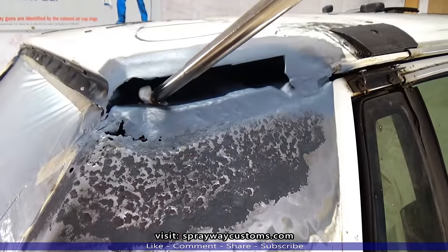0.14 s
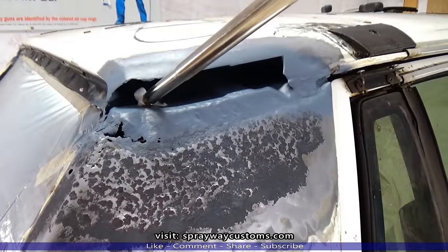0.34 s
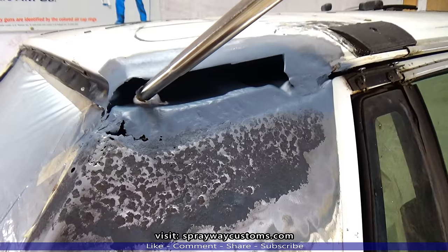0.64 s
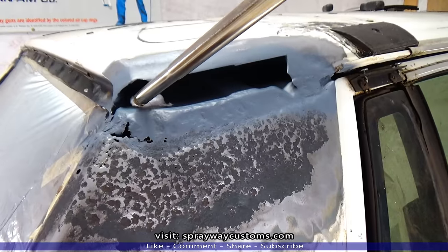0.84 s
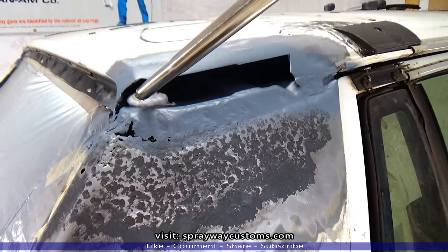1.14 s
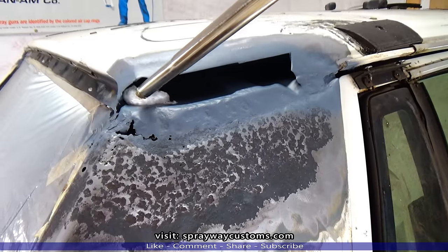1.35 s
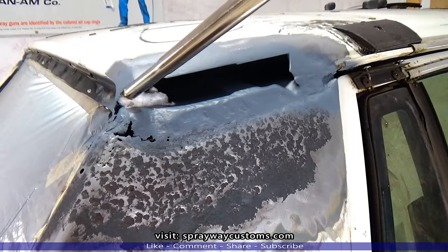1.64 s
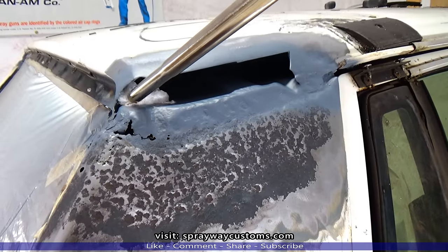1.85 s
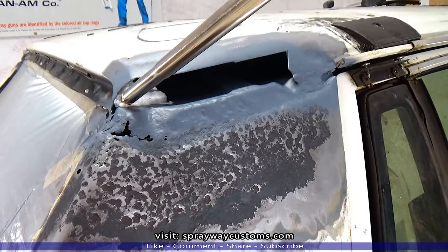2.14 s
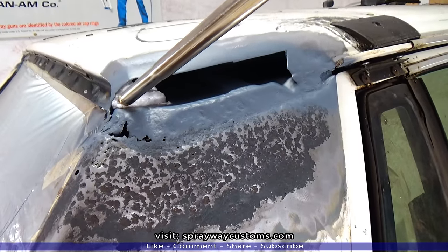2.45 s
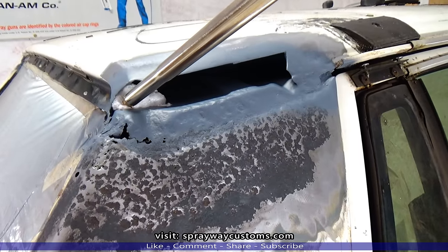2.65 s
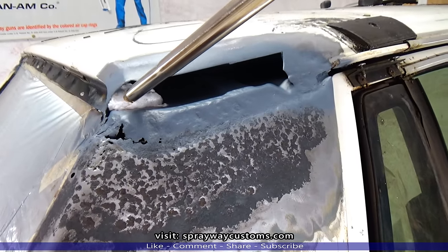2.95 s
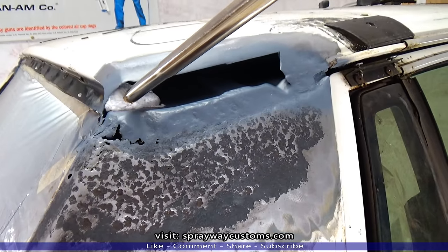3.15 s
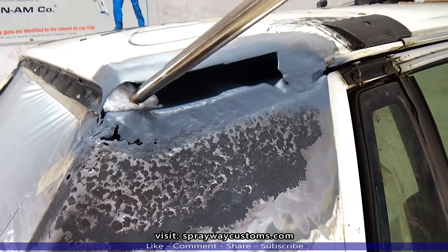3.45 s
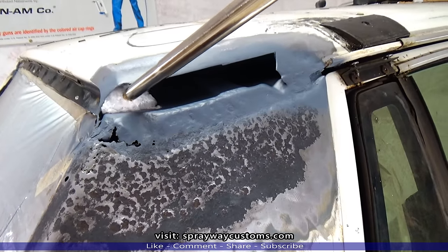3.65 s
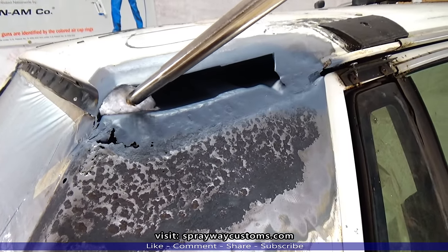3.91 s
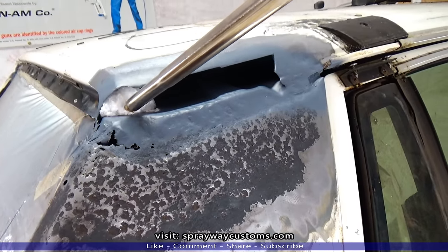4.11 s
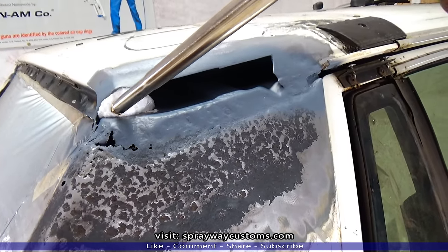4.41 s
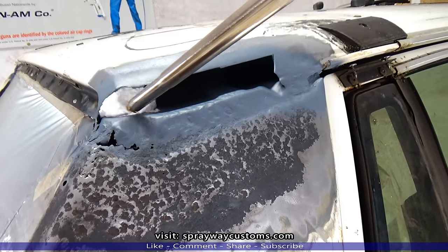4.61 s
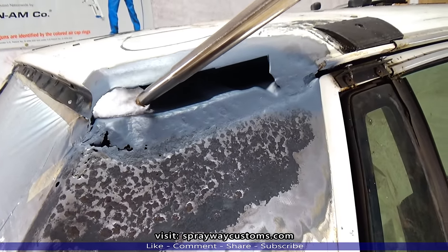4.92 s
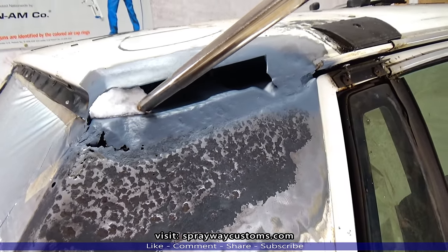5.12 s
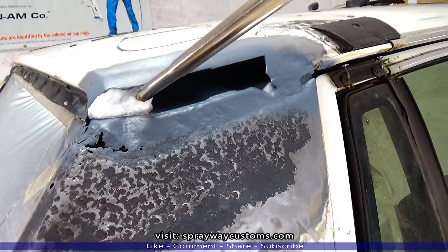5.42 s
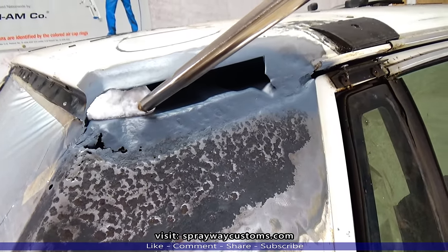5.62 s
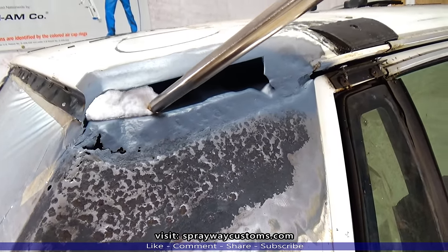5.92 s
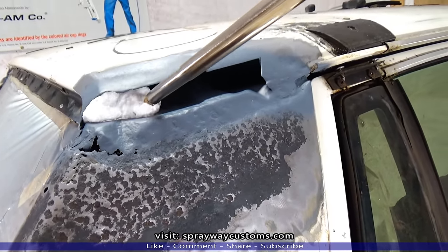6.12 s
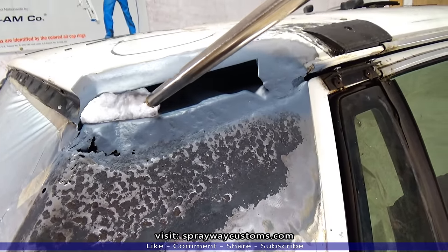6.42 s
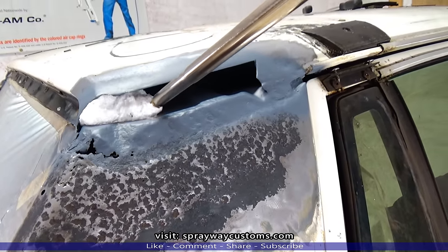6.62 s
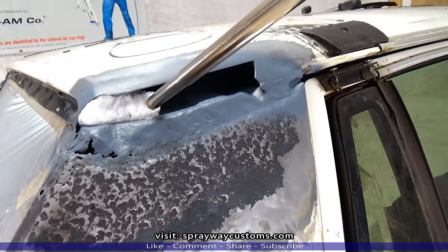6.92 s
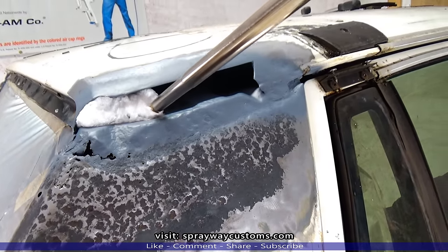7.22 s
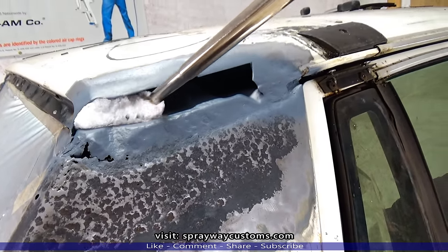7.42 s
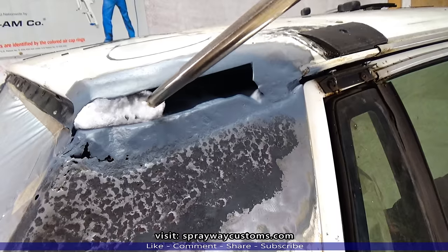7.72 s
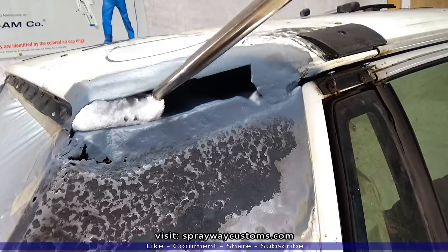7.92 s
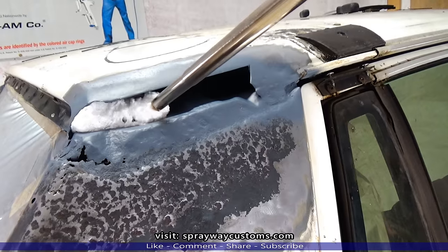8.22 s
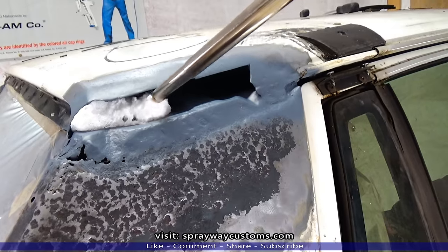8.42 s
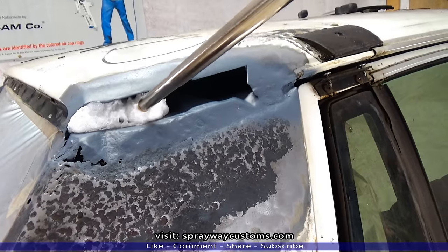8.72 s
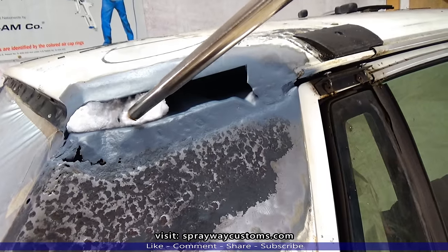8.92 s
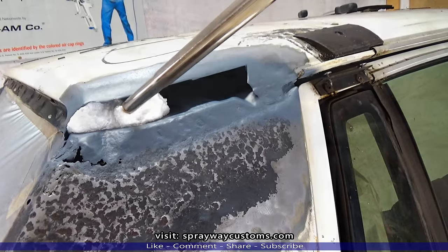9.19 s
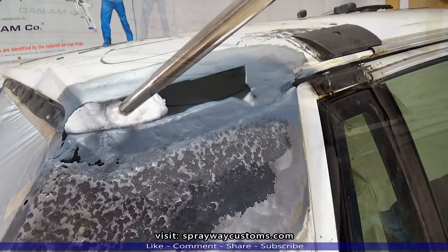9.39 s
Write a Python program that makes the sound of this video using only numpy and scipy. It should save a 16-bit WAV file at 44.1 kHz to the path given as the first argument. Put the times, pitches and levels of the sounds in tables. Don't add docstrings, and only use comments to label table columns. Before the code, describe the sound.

Very close, dry gas pops snap unevenly from a foam nozzle inside a hollow metal car body, with tiny ticks between them. A sharp metallic knock comes early. The pops thin out, grow busy again, then turn into hissing spurts and wet sputtering around six seconds, continuing to the end. A small microphone with little bass hears a faint garage hum behind.

```python
import sys
import numpy as np
from scipy import signal
from scipy.fft import rfft, irfft
from scipy.io import wavfile
from scipy.ndimage import uniform_filter1d

SR = 44100
rng = np.random.default_rng(int(sys.argv[2]) if len(sys.argv) > 2 else 0)


def transcribe(signal):
    frames = np.atleast_2d(signal).T
    limited = np.clip(frames, -1, 1)
    pcm = np.round(limited * 32767).astype(np.int16)
    wavfile.write(sys.argv[1], SR, pcm)


def linear_from_db(decibels):
    return 10 ** (np.asarray(decibels, float) / 20)


N = 421155
LEFT_RIGHT = np.array([[1], [-1]])

# pitch_hz, level_db (per Hz)
AIR_SPECTRUM = [(20, -28), (40, -0.5), (70, 1.5), (130, 6), (280, 6), (600, 1.5), (2000, -13.5),
                (16000, -12.5)]
# pitch_hz, level_db
FAN_TONES = [(263.8, -68), (312.2, -68)]
# time_s, left_minus_right_db
LEAN = [(0, .7), (2.3, .8), (3.2, 2), (3.7, -.2), (4.3, 0), (5.5, 1), (7, .3), (8.7, .2), (9.55, .9)]
# start_s, peak_db, contact_hardness_hz, on_rim (0 = open panel, 1 = folded rim)
KNOCKS = [(0.276, -36.5, 1300, 0), (0.303, -33, 1530, 0), (0.404, -27, 1300, 0), (0.947, -31, 1920, 0),
          (1.2742, -11.5, 2300, 0), (1.719, -20, 1920, 1), (3.305, -27, 2020, 1), (3.659, -18, 2370, 1),
          (4.798, -34, 700, 0), (4.867, -27.5, 700, 0), (5.907, -21.5, 746, 0), (6.311, -27.5, 640, 0)]
# pitch_hz, level_db, t60_s
PANEL_MODES = [(231, -14.5, 0.16), (349, -15, 0.32), (428.7, -6.5, 0.22), (513, -5, 0.15), (611, -13, 0.18),
               (674, -21, 0.11), (754, -5, .19), (817, -3, 0.12), (906, -13, 0.13), (1006, -11.5, 0.18),
               (1414, -6, 0.08), (1694, -4, 0.07), (2300, 0.5, .045)]
# pitch_hz, level_db, t60_s
RIM_MODES = [(224, -9.5, .14), (516, -3.5, 0.096), (581, -2, 0.1), (686, 0.5, 0.079), (810, -4, 0.071),
             (914, -4.5, 0.066), (1200, -1, 0.05), (1480, -8, .07), (2055, -5.5, 0.056)]

# pitch_hz, width_hz, level_db
EMPTY = [(770, 530, -8), (1320, 430, -5.5), (2190, 245, -4.5), (3430, 600, -5.5), (4090, 610, -3.5),
         (5260, 1100, -4.5), (7030, 370, -13)]
# pitch_hz, width_hz, level_db
DEEP = [(805, 350, -5), (1300, 430, -2.5), (2720, 830, 3.5), (3820, 410, -4.5), (4580, 690, -6),
        (6740, 1540, -6.5)]
# pitch_hz, width_hz, level_db
FILLED = [(808, 353, -8), (900, 390, -13), (1235, 535, -4.5), (2236, 154, -8.5), (2910, 356, -8.5),
          (3600, 710, -2.5), (4230, 610, -1.5), (4650, 820, 0), (5700, 1900, 0)]
# pitch_hz, width_hz, level_db
FULL = [(700, 573, -10), (950, 1050, -15), (1300, 645, -6), (2210, 257, -9), (2830, 570, -5.5),
        (3710, 670, -5), (4300, 730, -3.5), (5190, 814, -2.5), (6380, 1650, -7)]
DEEP_FROM_S, FILLED_FROM_S, FULL_FROM_S = 2.794, 3.75, 5.98
# pitch_hz, width_hz, level_db
MOUTH_BURSTS = [(9100, 2200, 6), (10100, 610, 1.5), (11750, 2600, 4), (13400, 1700, -10)]
# pitch_hz, width_hz, level_db
MOUTH_JET = [(8750, 1800, 0), (10430, 1780, 4.5), (12220, 2300, 5), (14100, 2300, -17)]

# time_s, burst_brightness_db
SHINE = [(0, -19.5), (.9, -21), (1.05, -19.5), (1.35, -20), (1.5, -19.5), (3.5, -22.5), (4.0, -25),
         (4.3, -16.5), (4.7, -19), (4.9, -14), (5.1, -9), (5.2, -22.5), (5.5, -27.5), (5.62, -19.5),
         (7.2, -13.5), (7.8, -15), (8.5, -15), (9.5, -15.5)]
# time_s, tilt_to_low_resonances_db
WARMTH = [(5.3, 0), (5.55, 2.5), (5.9, -1.5), (6.1, -3), (6.6, 3.5), (6.95, 11), (7.35, 2.5), (7.65, 12.5),
          (7.95, 3.5), (8.58, 7.5), (9.0, 8.5)]
# start_s,
# tilt_to_low_resonances_db, extra_mouth_brightness_db
COLOURED = [(1.072, 3.5, 2.5), (1.231, -1, 1.5), (1.346, -1, -1.2), (2.934, -2.7, -8), (3.435, 1, 0.12),
            (3.767, 2, -3), (4.050, 2.5, -0.2), (4.325, 4, 0), (4.559, 3.5, -1.5), (4.786, -5.5, 5),
            (4.797, -4, 11), (4.897, -1.2, 0.5), (5.061, -6.5, 4.5), (5.154, 0.1, 0.1), (5.173, -1, 8),
            (5.485, -4, 0.1), (5.534, 9.5, 4.5), (5.712, 4.5, 0.1), (7.168, 3, -3.85)]
# time_s, level_db
FLOW = [(0, -56.5), (3, -56), (5.2, -52.5), (5.8, -46), (6.31, -45), (6.42, -46.5), (6.5, -39.5),
        (6.72, -32.5), (7.05, -40), (7.2, -31.5), (7.4, -33), (7.56, -41), (7.8, -45), (7.92, -35),
        (8.15, -44), (8.58, -32.5), (8.8, -44), (9.3, -45.5), (9.55, -45)]
# start_s, end_s, start_db, end_db, brightness_db
SPURTS = [(4.869, 4.895, -31.5, -42, -12), (5.533, 5.562, -21, -22.5, -4), (5.71, 5.714, -20.5, -21, 2.5),
          (5.965, 5.973, -28.5, -30, -22), (6.035, 6.049, -39, -17, -10), (6.048, 6.148, -18, -20.5, -1.5),
          (6.146, 6.284, -24.5, -31.5, -12), (6.56, 6.568, -42, -22, -12.5),
          (6.57, 6.685, -23.5, -31.5, -10.5), (7.166, 7.184, -22, -32.5, -27.5),
          (7.281, 7.301, -34, -31, -5), (7.332, 7.351, -33, -33.5, -19.5),
          (7.358, 7.439, -39.5, -36.5, -21), (8.401, 8.43, -34, -33, -19.5), (8.483, 8.511, -34, -32, -19),
          (8.521, 8.605, -33, -35, -19), (8.633, 8.65, -44, -43, -9)]

# start_s, level_db, venting_s
SPLUTTERS = [(1.0735, -21, 0.0055), (3.101, -28, 0.0071), (3.182, -28.5, 0.0091), (4.326, -30, 0.0089),
             (4.899, -15.5, 0.0025), (6.5074, -21.5, 0.0037), (7.04, -27.5, 0.0051), (7.068, -27.5, 0.017),
             (7.168, -24, 0.0051), (7.3154, -21.5, 0.0095), (7.4086, -24.5, 0.0082),
             (7.7647, -28.5, 0.0027), (7.826, -23.5, 0.0023), (7.862, -27, 0.0018), (7.8807, -17, 0.001),
             (7.901, -19, 0.0012), (7.9288, -20.5, 0.0017), (8.025, -28.5, 0.0025), (8.041, -20, 0.0088),
             (8.1359, -26.5, 0.005), (8.205, -21.5, 0.0032), (8.328, -20.5, 0.0065), (8.399, -23, 0.0092),
             (8.45, -17, 0.0087), (8.528, -20, 0.0054), (8.9708, -23.5, 0.0011), (9.08, -24, 0.0069),
             (9.1476, -26, 0.00064), (9.2396, -21.5, 0.0011), (9.426, -21.5, 0.0078)]
# start_s, peak_db, venting_s
SPITS = [(6.727, -21, 0.0039), (6.7575, -23.5, 0.004), (6.8028, -29.5, 0.0066), (6.8597, -30, 0.0033),
         (6.9182, -29.5, 0.0068), (6.938, -20, 0.0047), (7.0105, -29, 0.0075), (7.133, -19, 0.006),
         (7.198, -25.5, 0.0045), (7.222, -23, 0.005), (7.3715, -21, 0.0055), (7.4727, -24.5, 0.005),
         (7.5102, -24, 0.0067), (7.6114, -31, 0.0054), (7.644, -31.5, 0.0033), (7.7044, -26, 0.0061),
         (7.8502, -24, 0.0054), (7.9613, -18, 0.0045), (7.9744, -23.5, 0.0065), (8.023, -15, 0.005),
         (8.065, -19.5, 0.005), (8.091, -18.5, 0.0032), (8.1783, -24, 0.0028), (8.2525, -24, 0.0047),
         (8.358, -24, 0.0046), (8.3866, -27, 0.0026), (8.769, -27, 0.0069), (8.74, -29, 0.0029),
         (8.877, -35, 0.005), (8.9349, -25, 0.0069), (9.0106, -23, 0.005), (9.043, -24, 0.005),
         (9.119, -20, 0.0065), (9.174, -23.5, 0.017), (9.344, -30, 0.018), (9.372, -28.5, 0.0046),
         (9.399, -30.5, 0.005), (9.447, -24, 0.0084), (9.5058, -30.5, 0.0076), (9.522, -25, 0.004)]
# start_s, peak_db, tear_ahead_ms (of the skin; 1 or less = none)
POPS = [(.0585, -14, 20), (.1054, -17.5, 19), (.1757, -18.5, 27.5), (.2502, -18, 30),
        (.3276, -15.5, 30.5), (.3593, -24, 0), (.4795, -18.5, 15.5), (.5668, -13.5, 31),
        (.6054, -18.5, 15.5), (.6732, -12, 11), (.7502, -18.5, 34), (.8352, -16.5, 0),
        (.8785, -15.5, 0), (.9502, -18.5, 0), (.9826, -16.5, 0), (1.0029, -17, 13.5), (1.047, -14, 0),
        (1.0723, -9, 0), (1.1466, -10.5, 8), (1.1733, -31, -0.5), (1.2107, -15.5, 20),
        (1.2308, -8.5, 0), (1.238, -13, 0), (1.273, -16, 0), (1.334, -15, 27), (1.3459, -10, 0),
        (1.446, -14.5, 20.5), (1.5027, -23, -2), (1.5237, -24.5, -0.5), (1.574, -23.5, -0.5),
              (1.6328, -18, 1), (1.6611, -18.5, 0), (1.7966, -25, 40.5), (1.8485, -19, 11.5),
              (1.882, -15, 1), (1.9077, -20, 10.5), (2.0, -21, 18), (2.0214, -18.5, 1), (2.0735, -18, -2),
              (2.1062, -19.5, 0.5), (2.171, -17, 1.5), (2.21, -23, 1.5), (2.295, -17.5, 26),
              (2.3664, -18, 1), (2.436, -20.5, 1), (2.5263, -18, 1), (2.5775, -19.5, 18.5),
              (2.6355, -19, 16.5), (2.665, -11, 14.5), (2.7565, -23.5, 25), (2.79, -25.5, 15.5),
        (2.821, -22.5, 8), (2.861, -15, 8.5), (2.8903, -15.5, 0), (2.9347, -12, 0),
             (2.9485, -19.5, 6.5), (2.9964, -14.5, 22), (3.02, -15, 0), (3.0409, -13, 0), (3.06, -19, 0),
             (3.0987, -15, 5.5), (3.1846, -18, 0), (3.242, -15.5, 0), (3.284, -13, 8), (3.305, -17.5, 0),
             (3.3227, -16.5, 0), (3.3556, -18.5, 0), (3.3945, -16, 0), (3.4353, -9.5, 1.2),
             (3.4785, -21.5, 8.5), (3.512, -19, 0.5), (3.562, -18.5, 0), (3.616, -21, 12.5),
             (3.634, -17.5, 0), (3.658, -15.5, 0), (3.681, -24, 0), (3.7123, -19, 0), (3.745, -17.5, 0),
             (3.751, -19.5, 0), (3.767, -13.5, 0),
        (3.8635, -15, 20), (3.9282, -23.5, 30), (3.963, -19.5, 10), (3.9762, -15.5, 0),
                (4.0498, -14, 12), (4.0731, -12.5, 1), (4.14, -15.5, 10.5), (4.152, -16.5, 2.5),
                (4.211, -18, 0), (4.2364, -21, 1), (4.2673, -17, 23.5), (4.3016, -16, 1.5),
                (4.3258, -15, -0.5), (4.3715, -18.5, 18.5), (4.4107, -16, 9), (4.438, -21.5, 1.3),
                (4.4816, -17, -2.5), (4.559, -13, 8.5), (4.624, -26, 4), (4.6621, -23, -1), (4.693, -31, 0),
                (4.7528, -23, 1), (4.7856, -8, 0.5), (4.846, -23.5, 31), (4.8968, -7, 1),
                (4.9166, -18, 1.5), (4.9576, -15, 6), (5.015, -19, 10),
        (5.061, -16, -0.5), (5.088, -20.5, 16), (5.1543, -13.5, 27), (5.2043, -21, 18.5),
               (5.219, -18.5, 0.5), (5.251, -21, 10), (5.274, -15, 1), (5.2969, -20, 12.5),
               (5.3514, -14, 6.5), (5.3607, -15.5, 0.5), (5.437, -16.5, 22.5), (5.461, -15, 7),
               (5.485, -10.5, 6.5), (5.508, -15, -0.5), (5.5344, -7.5, 1), (5.607, -23, 0.5),
               (5.623, -21.5, 0.5), (5.674, -25.5, 30), (5.7123, -8.5, -0.5), (5.753, -23, -1.5),
               (5.792, -27.5, 6), (5.874, -23, 4), (5.8952, -22, 26), (5.9143, -23, 8), (5.947, -22, 12),
               (5.9655, -19, 2.5), (6.002, -21, 7.5), (6.0216, -25.5, 1),
        (6.492, -26, -1), (6.525, -19, 0), (6.725, -23, 0.5), (7.8056, -14.5, -0.5), (7.84, -19, 4.5),
             (8.109, -17.5, 16.5), (8.2872, -16.5, 1), (8.874, -16.5, 0.5), (8.936, -25.5, 9),
             (9.117, -27, -1.5), (9.194, -15, 11.5), (9.2533, -18, 0.5), (9.295, -17.5, -1),
             (9.3104, -16, 1.5), (9.5446, -23.5, 0.5)]
# start_s, peak_db
TICKS = [(0.029, -35), (.364, -28.5), (.762, -34.5), (.971, -34), (1.030, -31), (1.063, -32), (1.279, -23),
         (1.587, -34), (1.779, -36.5), (1.962, -45), (2.284, -25), (2.402, -36), (2.465, -32), (2.49, -36),
         (2.542, -39), (2.674, -26.5), (2.713, -34), (2.833, -26), (3.809, -30), (3.831, -33),
         (4.06, -26.5), (4.102, -35), (4.179, -39), (4.638, -33.5), (4.794, -34), (4.7, -33), (4.714, -38),
         (4.833, -33), (4.990, -30), (5.033, -37.5), (5.051, -36), (5.065, -25), (5.11, -37),
         (5.163, -28.5), (5.171, -40), (5.246, -25), (5.332, -33), (5.404, -39), (5.428, -33), (5.525, -31),
         (5.588, -31.5), (5.646, -28.5), (5.688, -27), (5.782, -29.5), (5.815, -27), (5.846, -35),
         (5.888, -21), (6.195, -15.5), (6.205, -13), (6.373, -41.5), (6.45, -30), (6.574, -14.5),
         (6.949, -24.5), (7.169, -10), (7.265, -27), (7.591, -30), (7.736, -24), (7.746, -31.5),
              (7.757, -30), (7.790, -31.5), (7.812, -27.5), (7.913, -32), (7.943, -34), (8, -23.5),
              (8.032, -22), (8.125, -37), (8.158, -37), (8.176, -23.5), (8.231, -29), (8.240, -31),
              (8.270, -34.5), (8.302, -30), (8.319, -23.5), (8.357, -28.5), (8.978, -28.5), (8.990, -25),
              (9.030, -31.5), (9.156, -19.5), (9.220, -25.5)]


def rms_one(x):
    return x / np.sqrt(np.mean(x ** 2) + 1e-20)


def in_time(rows):
    time_s, *columns = np.transpose(rows)
    return [np.interp(np.arange(N) / SR, time_s, column) for column in columns]


def drift(rate_hz):
    r = np.exp(-2 * np.pi * rate_hz / SR)
    noise = rng.standard_normal(N + SR)
    return rms_one(signal.lfilter([1], [1, -2 * r, r * r], noise)[SR:])


def butterworth(x, order, hz, kind):
    return signal.sosfilt(signal.butter(order, hz, kind, fs=SR, output="sos"), x)


def ring(x, hz, width_hz):
    r = np.exp(-np.pi * width_hz / SR)
    w = 2 * np.pi * hz / SR
    return signal.lfilter([np.sin(w)], [1, -2 * r * np.cos(w), r * r], x + 1e-18)


def air():
    hz = np.maximum(np.fft.rfftfreq(N, 1 / SR), 1)
    curve_hz, curve_db = np.transpose(AIR_SPECTRUM)
    shape = linear_from_db(np.interp(np.log(hz), np.log(curve_hz), curve_db))
    mid, side = rms_one(irfft(rfft(rng.standard_normal((2, N))) * shape, N))
    t = np.arange(N) / SR
    tones = np.zeros(N)
    for pitch_hz, level_db in FAN_TONES:
        level = linear_from_db(level_db + 5.5 + 3.25 * drift(5.0))
        tones += level * np.sin(2 * np.pi * pitch_hz * t + 1.65 * drift(2.4))
    return linear_from_db(-57) * (mid + linear_from_db(-21.5) * side * LEFT_RIGHT) + tones


def echoes(x, t60, level_db, cut_hz, side_db):
    t = np.arange(round(t60 * SR)) / SR
    mid, side = rng.standard_normal((2, len(t))) * linear_from_db(-60 * t / t60)
    tail = butterworth(mid + linear_from_db(side_db) * side * LEFT_RIGHT, 1, cut_hz, "low")
    tail = butterworth(tail, 2, 560, "high")
    tail = tail / np.sqrt(np.sum(tail ** 2) / 2)
    return linear_from_db(level_db) * signal.fftconvolve(tail, x.mean(axis=0)[None])[:, :N]


def knocks():
    length = SR // 2
    out, t = np.zeros((2, N + length)), np.arange(length) / SR
    for s, peak_db, hard_hz, on_rim in KNOCKS:
        rattle = rng.standard_normal(length) * np.exp(-t / 0.004) * 0.02
        rattle[0] = 1
        crowd = rng.standard_normal(length) * linear_from_db(-5 - 60 * t / 0.14)
        sound = crowd * np.ones((2, 1))
        luck = rng.standard_normal((len(PANEL_MODES), 2))
        modes = RIM_MODES if on_rim > .5 else PANEL_MODES
        for (hz, level_db, t60), (strength, side) in zip(modes, luck):
            width_hz = np.log(1000) / np.pi / t60
            mode = linear_from_db(level_db - 8 + 1.3 * strength) * ring(rattle, hz, width_hz)
            sound += mode * linear_from_db(0.17 * side * LEFT_RIGHT)
        soft = butterworth(sound, 4, hard_hz, "low")
        at = round(s * SR)
        out[:, at:at + length] += linear_from_db(peak_db + 2.0) * soft
    return butterworth(out[:, :N], 4, 225, "high")


def resonate(x, modes, luck, side_db):
    out, driven = np.zeros((2, N)), np.flatnonzero(x)
    span = slice(driven[0], driven[-1] + SR // 20)
    for k, (hz, width_hz, level_db) in enumerate(modes):
        lean = linear_from_db(side_db * (-1) ** ((k + 1) // 2) * LEFT_RIGHT)
        mode = ring((x * luck[k])[span], hz, width_hz)
        out[:, span] += (-1) ** k * linear_from_db(level_db) * lean * mode
    return out


def through_hollow(body, bright, luck_db, mouth):
    t, luck = np.arange(N) / SR, linear_from_db(luck_db)
    deep = np.clip((t - DEEP_FROM_S) / 0.11, 0, 1)
    filled = np.clip((t - FILLED_FROM_S) / 0.11, 0, 1)
    full = np.clip((t - FULL_FROM_S) / 0.05, 0, 1)
    low = resonate(body * (1 - deep), EMPTY, luck, side_db=1.5)
    low += resonate(body * deep * (1 - filled), DEEP, luck, side_db=1.0)
    low += resonate(body * filled * (1 - full), FILLED, luck, side_db=0.5)
    low += resonate(body * full, FULL, luck, side_db=-0.03)
    high = resonate(bright, mouth, luck[8:], side_db=.5)
    high = high * linear_from_db(.7 / 2 * LEFT_RIGHT)
    low = butterworth(low, 3, [540, 7400], "band")
    return low + butterworth(high, 3, [7400, 14200], "band")


def froth(count, per_s, size_db, share):
    born = rng.random(count) < per_s / SR
    sizes = linear_from_db(size_db * np.minimum(rng.exponential(1, count), 3.5)) * rng.choice([-1, 1], count)
    return np.sqrt(share) * rms_one(born * sizes) + np.sqrt(1 - share) * rng.standard_normal(count)


def gas_flow():
    body_db, = in_time(FLOW)
    warm_db, = in_time(WARMTH)
    keep = np.exp(-1 / (0.024 * SR))
    lagging_db = signal.lfilter([1 - keep], [1, -keep], body_db - body_db[0]) + body_db[0]
    bright_db = -55 + np.maximum(body_db, lagging_db) + 39.0 - 0.14 * warm_db

    starts = (rng.random(N) < 260 / SR) * np.minimum(rng.exponential(1, N), 2.5)
    gasps = rms_one(1.3 + signal.lfilter([1], [1, -np.exp(-1 / (.0018 * SR))], starts))
    choppy_db = np.clip(1.2 * drift(45), -5, 4)
    body = gasps * linear_from_db(body_db + choppy_db)
    bright = gasps * linear_from_db(bright_db + choppy_db + 2.0 * drift(25))

    for start, end, start_db, end_db, shine_db in SPURTS:
        span = slice(round(start * SR), round(end * SR))
        slope_db = np.linspace(start_db, end_db, span.stop - span.start)
        level = linear_from_db(slope_db + 0.38 * choppy_db[span])
        body[span] += level
        bright[span] += level * linear_from_db(shine_db)
    return uniform_filter1d(body, size=30), uniform_filter1d(bright, size=30)


def splutters(rows):
    out, t = np.zeros(N + 2048), np.arange(2048) / SR
    for s, level_db, vent_s in rows:
        puff = froth(2048, per_s=3000, size_db=5.5, share=0.68) * np.exp(-(t / vent_s) ** 2)
        puff[0] = 0.011 / vent_s
        at = min(round(s * SR), N)
        out[at:at + 2048] += linear_from_db(level_db - 14.5) * puff
    return out[:N]


def crackle(start_s, end_s, count):
    place = ((np.arange(count) + rng.random(count)) / count) ** .6
    peaks_db = -38 + 2.5 * rng.standard_normal(count)
    return list(zip(start_s + place * (end_s - start_s), peaks_db))


def pockets():
    main = POPS
    tears = []
    for s, peak_db, ahead_ms in main:
        tear_db = peak_db - 7 + 2.5 * rng.standard_normal()
        if ahead_ms > 1:
            tears.append((s - ahead_ms / 1000, tear_db))
    ticks = [(s, peak_db + 2.5) for s, peak_db in TICKS]
    return [row[:2] for row in main] + tears + crackle(2.65, 9.5, count=60) + ticks


def pops(rows):
    body, bright, t = np.zeros(N + 256), np.zeros(N + 256), np.arange(256) / SR
    for s, peak_db in rows:
        puff, hiss = rng.standard_normal((2, 256))
        puff = puff * np.exp(-t / 0.00025) * 0.12
        puff[0] = np.sign(hiss[-1])
        at = round(s * SR)
        body[at:at + 256] += linear_from_db(peak_db - 3.5) * puff
        bright[at:at + 256] += linear_from_db(peak_db - 10.0) * hiss * np.exp(-t / 0.0013)
    return body[:N], bright[:N]


def foam():
    dry_bursts = pockets()
    spits = [(s, peak_db - 5.0, max(vent_s, .001)) for s, peak_db, vent_s in SPITS]
    wet_bursts = SPLUTTERS + spits

    onsets = np.sort([round(row[0] * SR) for row in dry_bursts + wet_bursts])
    owner = np.searchsorted(onsets, np.arange(N), side="right")
    luck_db = 2.2 * rng.standard_normal((len(onsets) + 1, 12))[owner].T
    luck_db[7:9, round(FILLED_FROM_S * SR):round(4.3 * SR)] -= 5.5
    tilt = np.r_[np.linspace(1, -1, 8), np.zeros(4)][:, None]
    for s, warm_db, mouth_db in COLOURED:
        span = slice(round((s - .003) * SR), round((s + .008) * SR))
        luck_db[:, span] = luck_db[:, span] / 3 + tilt * warm_db + (tilt == 0) * mouth_db

    body, bright = pops(dry_bursts)
    wet = splutters(wet_bursts)
    shine_db, = in_time(SHINE)
    bright = linear_from_db(shine_db - 2.5 + luck_db[4] / 2) * (bright + linear_from_db(4.5) * wet)
    bursts = through_hollow(body + wet, bright, luck_db, MOUTH_BURSTS)

    flow_body, flow_bright = gas_flow()
    swarm = froth(N, per_s=3000, size_db=3.5, share=0.55)
    warm_db, = in_time(WARMTH)
    colour_db = tilt * warm_db + np.array([drift(9) for mode in tilt])
    flow_body = linear_from_db(-12.0) * flow_body * swarm
    flow_bright = linear_from_db(-8.5) * flow_bright * swarm
    return bursts + through_hollow(flow_body, flow_bright, colour_db, MOUTH_JET)


def scene():
    close = foam() + knocks()
    close = close + echoes(close, t60=.05, level_db=-18, cut_hz=5000, side_db=-12)
    wet = close + echoes(close, t60=.33, level_db=-22, cut_hz=4900, side_db=0.0)
    lean_db, = in_time(LEAN)
    return wet * linear_from_db(lean_db / 2 * LEFT_RIGHT) + air()


def low_pass(x):
    return signal.sosfilt(signal.butter(12, 16800, fs=SR, output="sos"), x)


def record(dry):
    thin = butterworth(dry, 2, 60, "high")
    rounded = .8 * np.tanh(thin / .8)
    cut = signal.sosfilt(signal.cheby2(10, 50, 16700, fs=SR, output="sos"), rounded)
    return low_pass(cut)


dry = scene()
out = record(dry)
transcribe(out)
```